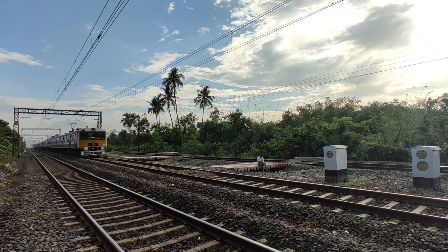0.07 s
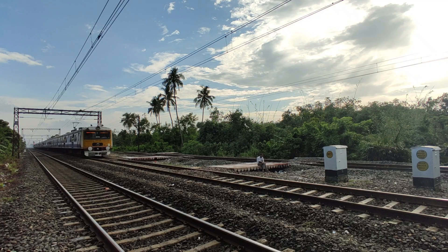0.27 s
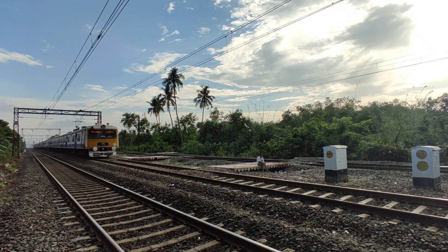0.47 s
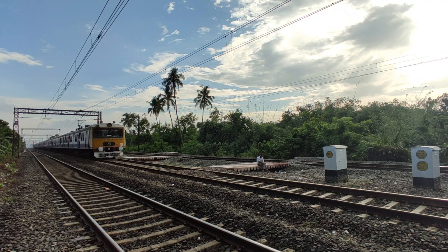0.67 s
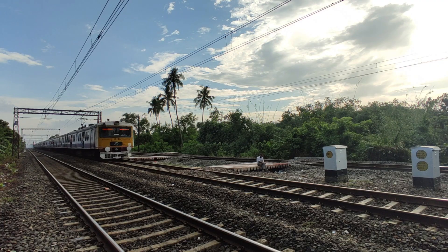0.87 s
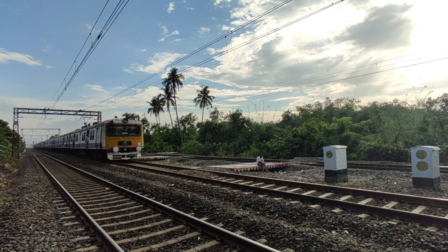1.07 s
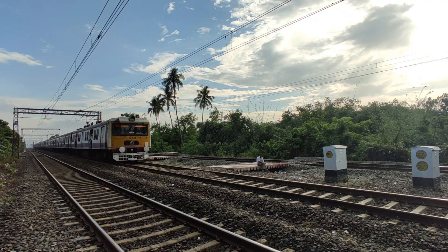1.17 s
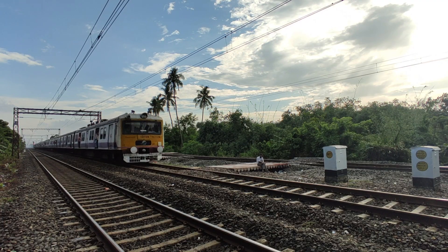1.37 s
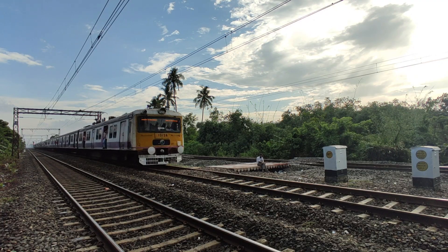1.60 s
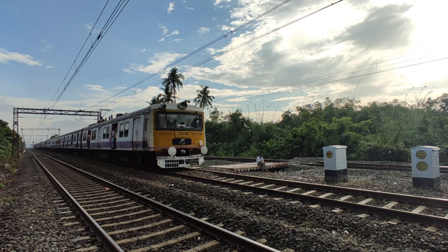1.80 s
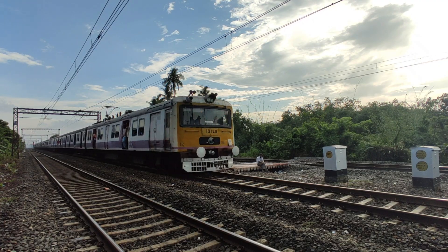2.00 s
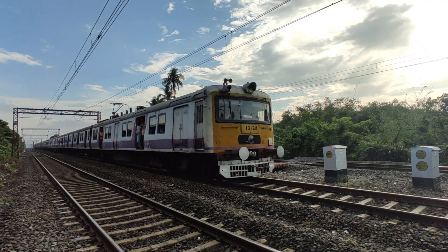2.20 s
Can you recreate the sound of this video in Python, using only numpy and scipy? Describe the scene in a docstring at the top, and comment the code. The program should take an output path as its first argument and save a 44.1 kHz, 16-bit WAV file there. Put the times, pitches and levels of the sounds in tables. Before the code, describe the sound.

Two-horn blast from an approaching electric train, starting with a whistle and leaving a low rumble.

```python
"""Electric train, two air horns.

A train approaches on open track and sounds two horns a few hertz apart. The upper one squeaks;
the lower one overblows into a whistle and rasps down to its note; then both blare and beat.
The blast echoes off the trees and leaves the wheel rumble. A limiter holds the bass down."""
import sys
import numpy as np
from scipy import signal
from scipy.fft import rfft, irfft, next_fast_len
from scipy.io import wavfile
from scipy.ndimage import uniform_filter1d, minimum_filter1d

SR = 44100
rng = np.random.default_rng(int(sys.argv[2]) if len(sys.argv) > 2 else 0)


def digitize_waveform(pressure):
    """Quantize a signal to 16-bit integers and store it at the path in sys.argv[1].

    Rows of a 2-D input are taken as channels; values are limited to [-1, 1].
    """
    field = np.atleast_2d(pressure).T
    bounded = np.clip(field, -1, 1)
    quanta = np.round(bounded * 32767).astype(np.int16)
    wavfile.write(sys.argv[1], SR, quanta)


N = 99225
TIME_S = np.arange(N) / SR
CUTOFF_HZ = 15800

# noise envelopes (time [s], level [dB])
ROLL_LEVEL_DB = [(0, -42), (1.3, -45), (1.85, -33.5), (2.25, -30.5)]
HISS_LEVEL_DB = [(0, -43), (2.25, -37.5)]
AIR_LEVEL_DB = [(.05, -75), (.48, -50), (.55, -41), (.76, -35), (.83, -48), (1.62, -47), (1.8, -65)]
# noise spectra (frequency [Hz], relative density [dB])
ROLL_SPECTRUM_DB = [(30, -1.5), (140, -11), (215, 1), (480, -11), (640, -6.5), (880, -5), (1200, -19),
                    (2400, -21.5), (4000, -30), (15000, -60)]
HISS_SPECTRUM_DB = [(3000, -19.5), (6500, -11.5), (7600, -1), (8300, -6), (9200, -14.5), (10200, -27.5),
                    (15000, -47.5)]
AIR_SPECTRUM_DB = [(200, -23), (700, 9.5), (2700, -31.5), (4200, 2.5), (7800, -9.5), (11000, -20.5)]
# noise stereo image (frequency [Hz], left-right correlation [1])
NOISE_CORRELATION = [(300, 0.89), (1500, 0.017)]
# tree echo colour (frequency [Hz], gain [dB])
ECHO_GAIN_DB = [(310, -13), (620, -18), (780, -23), (1300, -17), (8000, -17), (14000, -23)]

# horn fundamentals (time [s], pitch [Hz])
HIGH_PITCH_HZ = [(.07, 318), (.15, 316.6), (.74, 319), (.87, 317.3), (1.55, 316.8), (1.66, 317.8),
                 (1.76, 320)]
LOW_PITCH_HZ = [(.18, 311.5), (.48, 311.1), (.6, 310), (.85, 309.2), (1.55, 308.8), (1.8, 311)]
# envelope of each horn regime, before brightening (time [s], level [dB])
SQUEAK_LEVEL_DB = [(.064, -69), (0.076, 9), (.11, 6), (0.172, 9), (.23, -51)]
HIGH_LEVEL_DB = [(.68, -50), (.73, -4), (.8, -.5), (1.54, 0), (1.65, -1), (1.77, -5), (1.84, -30)]
WHISTLE_LEVEL_DB = [(0.102, -57), (.175, -21.5), (.215, -3), (.45, 4.5), (.56, -1.5), (0.719, -1.5),
                    (.77, -15), (.82, -63)]
BUZZ_LEVEL_DB = [(0.129, -13), (0.208, 2), (.35, 1.5), (0.501, 7), (.72, -20), (.82, -40)]
RASP_LEVEL_DB = [(.14, -40), (0.222, -14.5), (.48, -15.5), (.53, -2), (0.678, 4), (0.762, 1.5),
                 (0.841, -40)]
LOW_LEVEL_DB = [(.1, -60), (.2, -28), (.37, -27), (.48, -3), (.56, -1), (.8, 0), (1.55, 0), (1.66, -2),
                (1.76, -6), (1.84, -35)]
# partials of each regime at 0 dB envelope (frequency [Hz], rms level [dB])
SQUEAK_TONE_DB = [(1585, -48), (3170, -49), (4755, -53.5), (6340, -56.5), (7920, -45.5), (9510, -48.5),
                  (11100, -75.5)]
HIGH_TONE_DB = [(317, -15), (634, -19), (950, -32), (1270, -31), (1585, -29), (1900, -31), (2220, -26),
                (3170, -30), (4000, -42), (5700, -42), (6700, -42), (7600, -34), (8900, -36), (10300, -57),
                (12500, -55), (15500, -66)]
WHISTLE_TONE_DB = [(778, -8), (1556, -38), (2334, -41), (3900, -52), (4670, -43), (6200, -51), (7780, -31),
                   (9340, -40), (11000, -66)]
BUZZ_TONE_DB = [(2800, -54.5), (5900, -59.5), (7400, -40), (8200, -71), (8850, -40.5), (9900, -45),
                (11000, -70.5)]
RASP_TONE_DB = [(930, -72), (1085, -24.5), (1395, -43), (2600, -38), (3600, -54), (5500, -54.5),
                (7500, -34), (8200, -52), (8850, -40), (10800, -64)]
LOW_TONE_DB = [(310, -14), (620, -19), (930, -27), (1240, -26), (1550, -31), (1860, -37), (2170, -33),
               (4000, -43), (6000, -51), (7700, -45), (9000, -50), (10500, -66)]
# horn balance (frequency [Hz], left over right [dB])
HORN_PAN_DB = [(310, 1.5), (620, -1.5), (780, 3), (1300, -1), (2200, -2), (5500, -5), (7800, 3), (9000, 4),
               (12000, -3)]
# earlier arrival at the right ear as the train swings in (time [s], lead [s])
RIGHT_LEAD_S = [(.3, 0.0002513), (1.0, .000195), (1.8, 0.00013)]


def from_db(db):
    """Decibels to gain."""
    return 10 ** (np.asarray(db) / 20)


def in_time(table):
    """Control curve at every sample."""
    return np.interp(TIME_S, *np.transpose(table))


def at_hz(table, hz):
    """Spectrum read on a log-frequency axis."""
    knots_hz, values = np.transpose(table)
    return np.interp(np.log(hz + 1e-9), np.log(knots_hz), values)


def drift(corner_hz):
    """Smooth random curve, unit deviation."""
    hop, warmup = 40, 1000
    pole = np.exp(-2 * np.pi * corner_hz * hop / SR)
    white = rng.standard_normal(N // hop + warmup + 2)
    slow = signal.lfilter([1], [1, -2 * pole, pole * pole], white)[warmup:]
    return np.interp(np.arange(N) / hop, np.arange(len(slow)), slow / slow.std())


def noise(spectrum_db, level_db):
    """Coloured stereo noise: narrow bass, wide treble."""
    hz = np.arange(N // 2 + 1) * SR / N
    correlation = at_hz(NOISE_CORRELATION, hz)
    mid, side = rfft(rng.standard_normal((2, N))) * from_db(at_hz(spectrum_db, hz))
    out = irfft(np.sqrt(1 + correlation) * mid + np.sqrt(1 - correlation) * side * [[1], [-1]], N)
    return out / out.std() * from_db(in_time(level_db))


def thin_hiss():
    """Slowly rising hiss, peak near 7.6 kHz."""
    return noise(HISS_SPECTRUM_DB, HISS_LEVEL_DB)


def wheel_rumble():
    """Rolling noise; swells as the train nears."""
    return noise(ROLL_SPECTRUM_DB, ROLL_LEVEL_DB)


def tree_echo(x, t60_s=1.5, delay_s=.03):
    """Diffuse decay off the trees, different on each side."""
    tail = rng.standard_normal((2, N)) * from_db(-60 * TIME_S / t60_s) * (TIME_S > delay_s)
    tail /= np.sqrt((tail ** 2).sum(axis=1, keepdims=True))
    size = next_fast_len(2 * N)
    colour = from_db(at_hz(ECHO_GAIN_DB, np.arange(size // 2 + 1) * SR / size))
    return irfft(rfft(x, size) * rfft(tail, size) * colour, size)[:, :N]


def slap_echo(x, delay_s=.252, gain_db=-11.5, top_hz=380):
    """The edge of the wood reflects the fundamentals once."""
    dull = signal.sosfilt(signal.butter(4, top_hz, fs=SR, output="sos"), x)
    return from_db(gain_db) * np.pad(dull, ((0, 0), (int(delay_s * SR), 0)))[:, :N]


def air_blast():
    """Hiss of the air driving the horns."""
    return noise(AIR_SPECTRUM_DB, AIR_LEVEL_DB)


def diaphragm(pitch_hz, jitter=.0009, jitter_hz=50, zero_phase_s=1.165):
    """Slightly unsteady vibration: phase [cycles], median pitch [Hz]."""
    cycles = np.cumsum(in_time(pitch_hz) * (1 + jitter * drift(jitter_hz))) / SR
    return cycles - np.interp(zero_phase_s, TIME_S, cycles), np.median(np.array(pitch_hz)[:, 1])


def partials(cycles, base_hz, tone_db, level_db, brighten_per_octave=0, first_order=1):
    """Harmonics of one vibration; the path makes higher ones waver more, differently at each ear."""
    waver_hz, scatter_base, scatter_per_khz, scatter_max = 13.9, .12, .43, .83
    start_s, end_s, fade_s = level_db[0][0], level_db[-1][0], .008
    on = (TIME_S >= start_s) & (TIME_S <= end_s)
    envelope_db = in_time(level_db)[on]
    lead_cycles = base_hz * in_time(RIGHT_LEAD_S)[on]
    waver_pool = np.concatenate([drift(waver_hz) + 1j * drift(waver_hz) for _ in range(4)])
    out = np.zeros((2, N))
    for order in range(first_order, int(CUTOFF_HZ / base_hz) + 1):
        hz = order * base_hz
        scatter = min(scatter_base + scatter_per_khz * (hz - base_hz) / 1000, scatter_max)
        steepness = 1 + brighten_per_octave * np.log2(order)  # louder is brighter
        rms = from_db(at_hz(tone_db, hz) + envelope_db * steepness)
        amplitude = rms * np.sqrt(2 / (1 + 2 * scatter ** 2))
        offset_cycles = rng.random() * (order > 2)  # orders 1 and 2 keep their beat timing
        for ear, sign in enumerate((1, -1)):
            waver = waver_pool[rng.integers(len(waver_pool) - N):][:len(envelope_db)]
            pan = from_db(sign * at_hz(HORN_PAN_DB, hz) / 2)
            ear_cycles = cycles[on] - sign * lead_cycles / 2
            wave = np.exp(2j * np.pi * (order * ear_cycles + offset_cycles))
            out[ear, on] += amplitude * pan * (wave * (1 + scatter * waver)).real
    return out * np.clip(np.minimum(TIME_S - start_s, end_s - TIME_S) / fade_s, 0, 1)


def high_horn(overblow=5):
    """Squeaks on its fifth harmonic as the valve opens; the note speaks late."""
    cycles, hz = diaphragm(HIGH_PITCH_HZ)
    cycles += .5  # opposes the low horn at zero_phase_s
    squeak = partials(cycles * overblow, hz * overblow, SQUEAK_TONE_DB, SQUEAK_LEVEL_DB,
                      brighten_per_octave=.056)
    note = partials(cycles, hz, HIGH_TONE_DB, HIGH_LEVEL_DB, brighten_per_octave=.8)
    return squeak + note


def low_horn(overblow=2.5):
    """Overblows into a whistle with a thin buzz, rasps on half orders, settles on its note."""
    cycles, hz = diaphragm(LOW_PITCH_HZ)
    note = partials(cycles, hz, LOW_TONE_DB, LOW_LEVEL_DB, brighten_per_octave=.9)
    whistle = partials(cycles * overblow, hz * overblow, WHISTLE_TONE_DB, WHISTLE_LEVEL_DB)
    buzz = partials(cycles, hz, BUZZ_TONE_DB, BUZZ_LEVEL_DB, first_order=9)
    rasp = partials(cycles / 2, hz / 2, RASP_TONE_DB, RASP_LEVEL_DB, first_order=6)
    return note + whistle + buzz + rasp


def scene():
    """Horns and echoes over rumble and hiss."""
    horns = low_horn() + high_horn() + air_blast()
    return horns + tree_echo(horns) + slap_echo(horns) + wheel_rumble() + thin_hiss()


def bass_limiter(x, split_hz=1150, threshold_db=-13, slope=.43, detector_fall_db_per_s=203, makeup_db=.6):
    """Fast gain reduction; flattens the beats in the bass."""
    bass = signal.sosfiltfilt(signal.butter(4, split_hz, fs=SR, output="sos"), x)
    power = uniform_filter1d((bass ** 2).mean(axis=0), size=280)
    over_db = np.maximum(10 * np.log10(np.maximum(power, 1e-12)) - threshold_db, 0)
    fall_db = detector_fall_db_per_s * TIME_S
    held_db = np.maximum.accumulate(over_db + fall_db) - fall_db
    reduction_db = slope * uniform_filter1d(held_db, size=200)
    return x - bass + bass * from_db(makeup_db - reduction_db)


def peak_limiter(x, ceiling=.95, window_samples=221):
    """Look-ahead gain keeps peaks under the ceiling."""
    gain = ceiling / np.maximum(np.abs(x).max(axis=0), ceiling)
    return x * uniform_filter1d(minimum_filter1d(gain, window_samples), window_samples)


def record(dry):
    """Bass limiter, peak limiter, steep low-pass."""
    lowpass = signal.cheby2(14, 60, CUTOFF_HZ + 400, fs=SR, output="sos")
    return signal.sosfilt(lowpass, peak_limiter(bass_limiter(dry)))


dry = scene()
out = record(dry)
digitize_waveform(out)
```